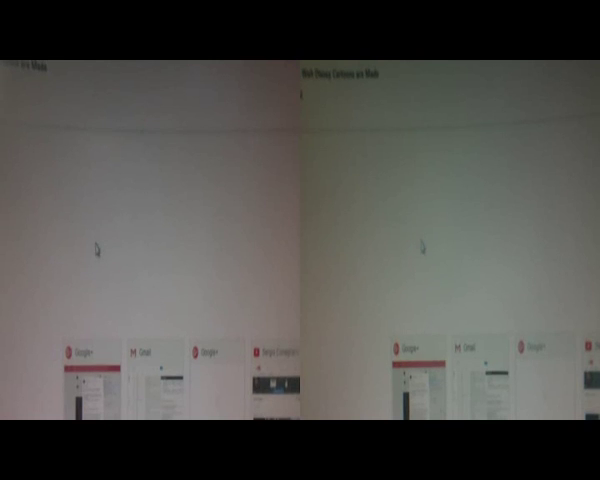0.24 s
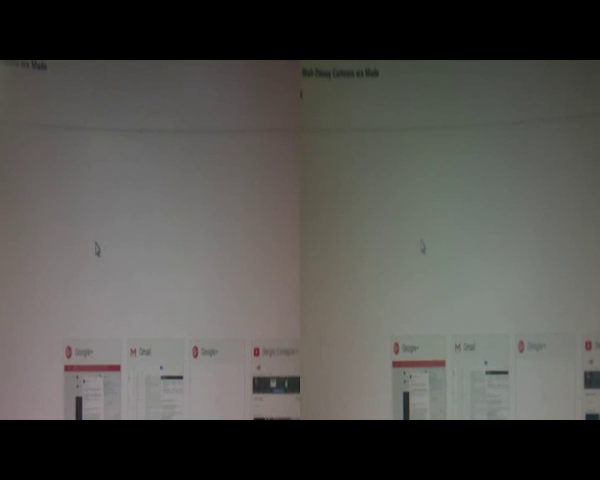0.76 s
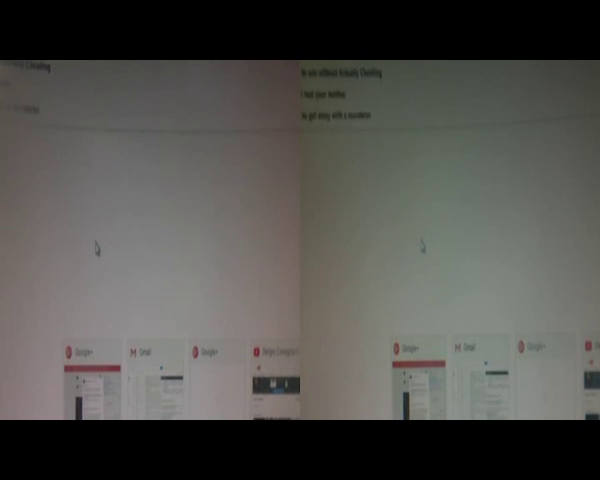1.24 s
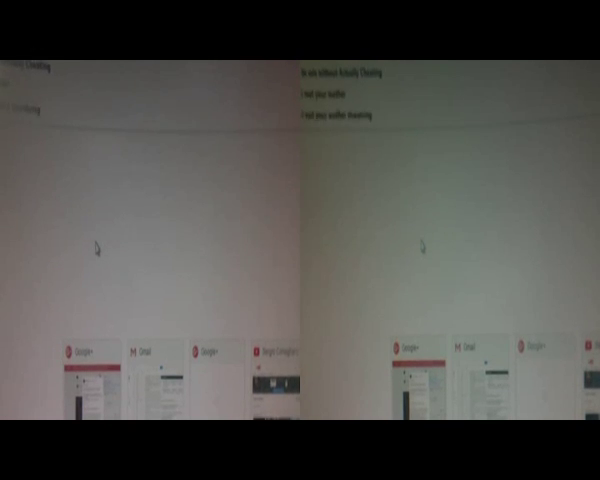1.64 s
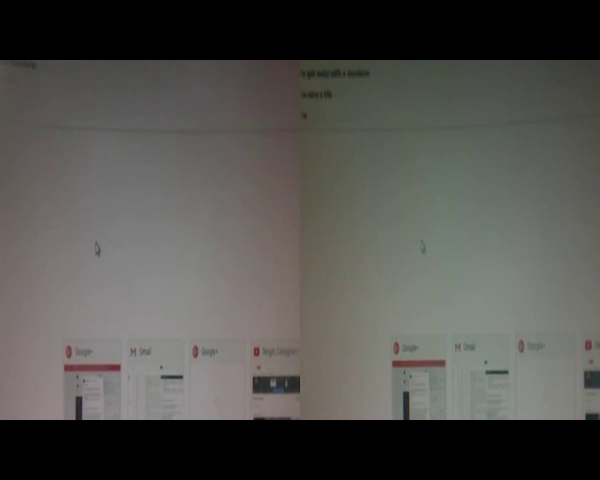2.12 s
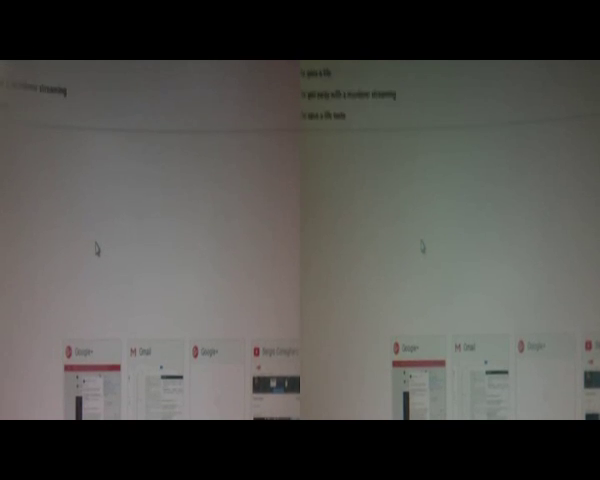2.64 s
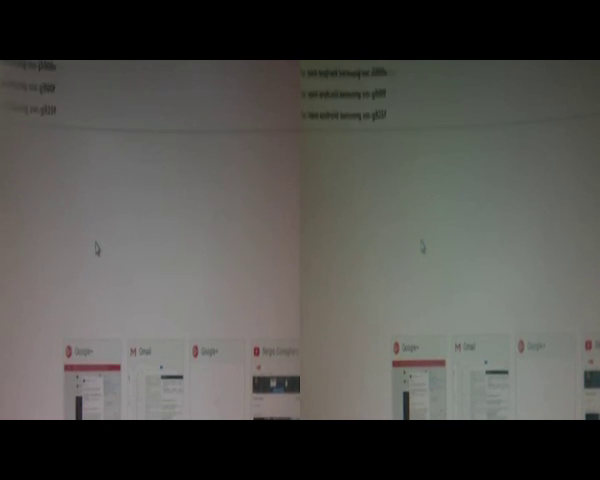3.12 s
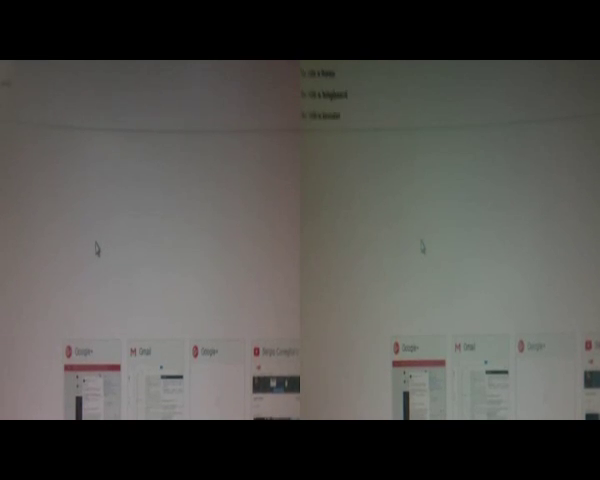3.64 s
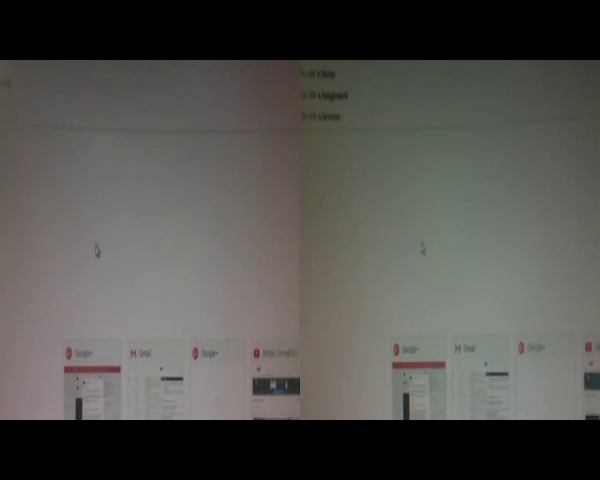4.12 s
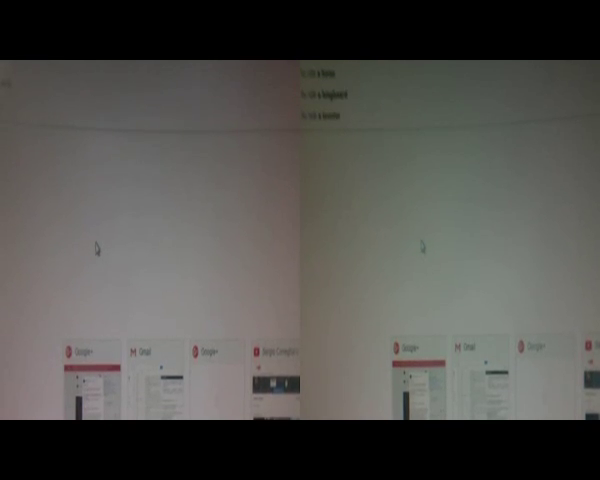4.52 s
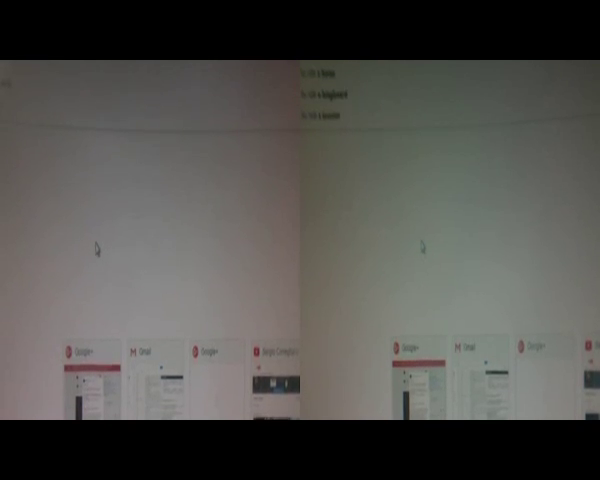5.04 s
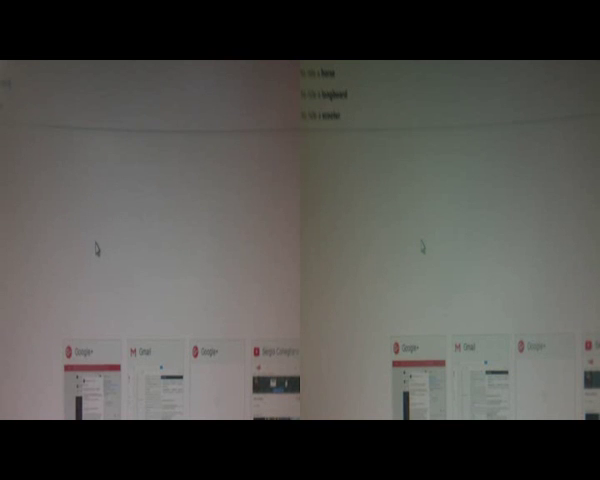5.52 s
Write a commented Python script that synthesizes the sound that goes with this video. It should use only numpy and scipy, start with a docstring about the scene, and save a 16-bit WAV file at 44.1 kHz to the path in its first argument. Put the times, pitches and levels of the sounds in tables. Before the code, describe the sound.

A laptop in a small room is heard very closely through the stereo microphones in its lid. At once a hard, rattling knock hits the plastic case, bouncing for a few hundredths of a second; a faint drag follows. At about 0.28 s a second knock chatters into a short scrape with thin, high squeals, gone by 0.5 s. The soft wide hiss and faint low hum sink, then creep back over the next second. A dull, weak key touch comes at 0.65 s, another at 1.07, then clearer strokes at 1.4 and 1.5 over a light brushing wash, and one near 2.0. From 2.5 to 3.3 s clicks and loose taps crowd together, with a sharp one at 2.95. More crisp bursts come at 3.5 and 3.7 to 4.05. After a pause, a stroke and a lighter one fall at 4.7 to 4.85; a last quick pair comes around 5.7.

```python
"""A small room: typing on a laptop, heard by the pair of microphones in its own lid.
Two heavy, rattling knocks on the case and a short plastic scrape come first, then full keystrokes and
light taps in quick bursts. Each contact is banded noise and a brief ring, coloured by the case modes and
left to die away; each stroke also adds a plate flex and a low thump. Swells of filtered noise make washes
and scrapes, gliding tones make the squeals, and a soft wide hiss with a faint wavering hum lies beneath."""
import sys
import numpy as np
from scipy import signal
from scipy.fft import rfft, irfft
from scipy.io import wavfile

SR = 44100
rng = np.random.default_rng(int(sys.argv[2]) if len(sys.argv) > 2 else 0)


def dump(signal):
    """Clip the signal to [-1, 1] and save it as 16-bit WAV at the path in sys.argv[1]."""
    limited = np.clip(np.atleast_2d(signal).T, -1, 1)
    pcm = np.round(limited * 32767).astype(np.int16)
    wavfile.write(sys.argv[1], SR, pcm)


N = 254456
TIME = np.arange(N) / SR  # s
FREQ = np.maximum(np.arange(N // 2 + 1) * SR / N, 1)  # Hz, kept off zero

# Background hiss before its trim and dip. Each row: frequency in Hz, density in dB per Hz,
# side over mid in dB.
HISS_COLOUR = [(25.8, -90.5, 11), (77, -76.5, 12), (173, -71.5, 9), (392, -75.5, 9.5), (990, -84, 3.5),
               (2200, -88.5, 1.5), (5040, -93, 4.5), (7280, -96, 6), (8150, -98, 4.5), (9050, -104, 42),
               (12400, -99, 18), (15000, -106, 35.5)]
# Hum of mains and fan, before the same trim and dip. Each row: frequency in Hz, width in Hz of
# a resonance that is applied twice, level in dB.
HUM_TONES = [(120.2, 4.4, -66), (208.4, 24, -62)]
# Case resonances under a slow drag. Each row: frequency in Hz, width in Hz, relative level in dB.
DRAG_MODES = [(1217, 110, 7), (1775, 180, 2.5), (2810, 330, 2), (5090, 135, -12.5)]
# Swells of filtered noise: the rattling wash of the first knock, plastic sliding, a hand brushing,
# a soft wash around a keystroke. Each row: start in seconds, swell in seconds, hold in seconds,
# fade by 60 dB in seconds, wash level in dB, squeak level in dB.
WASHES = [(0, 0.0015, 0.023, 0.16, -25, -30.5), (0.083, 0.048, 0.12, 0.45, -52, -48),
          (0.278, 0.0091, 0.016, 0.08, -32, -18), (0.313, 0.024, 0.046, 0.14, -35, -25.5),
          (0.387, 0.008, 0.031, 0.16, -40.5, -44), (0.605, 0.053, .03, 0.6, -53.5, -60),
          (1.143, 0.027, .025, .12, -51.5, -81), (1.61, 0.11, 0.18, 1.85, -50.5, -61)]
# Broad colour of these swells. Each row: frequency in Hz, relative level in dB.
WASH_COLOUR = [(60, -21.5), (160, -2), (270, 5), (390, 3), (510, 6), (760, 2), (1190, 2.5), (1500, 0),
               (1900, 2), (2400, -4), (3000, 0.5), (4000, -5.5), (7000, -10.5), (15000, -38.5)]
# Narrow treble resonances of these swells. Each row: frequency in Hz, width in Hz, relative level in dB.
SQUEAK_MODES = [(4700, 150, -9.5), (4935, 41, -1.5), (5130, 140, 0.5), (5340, 50, 0), (5590, 170, 4),
                (6260, 170, 3.5), (7160, 560, 2.5), (8450, 89, -2), (12240, 410, 5.5), (12750, 100, 5),
                (12800, 1300, -6.5), (13750, 53, 3.5)]
# Squeals of the catching edge. Each row: start in seconds, hold in seconds, pitch in Hz,
# glide in Hz per second, level in dB.
SQUEALS = [(0.289, .003, 5040, 12000, -21), (0.34, 0.013, 5330, -18000, -25.5),
           (0.359, 0.01, 5270, -9000, -35), (0.399, .018, 5460, 6000, -35.5)]
# Modes of the case. Each row: frequency in Hz, width in Hz, level over the direct sound in dB.
CASE_MODES = [(210.3, 20, 6), (301.5, 24, 2), (484.6, 14, 1), (526, 5.1, -6), (642.5, 28, 3),
              (780, 30, -10.5), (838, 7.6, -9), (942, 31, -4.5), (1057, 69, -0.5), (1124, 14, -9.5),
              (1202, 24, 2.5), (1385, 63, -6.5), (1620, 10, -10.5), (1770, 15, -17), (1988, 92, -0.5),
              (2200, 19, -6.5), (2340, 13, -5), (2920, 130, -11), (3430, 99, -2.5), (3643, 52, -2.5),
              (4190, 50, -3), (4900, 36, -8.5), (5400, 57, -2.5)]
# Pitches at which the case hardly radiates. Each row: frequency in Hz, width in Hz,
# dB left at the centre.
CASE_DIPS = [(140, 22, -9.5), (416, 33, -7.5), (575, 12, -4)]
# Colour and decay of any contact. Each row: frequency in Hz, relative level in dB,
# tail decay by 60 dB in seconds.
CONTACT_COLOUR = [(103, -14.5, .28), (148.1, -17, 0.31), (228, -3.5, 0.097), (390, -16, 0.18),
                  (650, -16, 0.23), (900, -12, 0.36), (1260, -12.5, 0.084), (2180, -12.5, 0.21),
                  (4130, -8, 0.15), (5800, -8.5, 0.27), (8560, -11.5, 0.039), (14400, -17, 0.086)]
# Blows on the case, with their bounces and the bumps of the scrape; levels are before contact and case colour.
# Each row: time in seconds, thud in dB, clack in dB, click in dB, ring in Hz, ring level in dB.
KNOCKS = [(.0066, -32.5, -13, -25.5, 900, 4), (.0076, -28.5, -14, -14.5, 1435, 0),
          (.008, -25, -19, -25, 493.6, -1.5), (.0088, -25, -34, -19.5, 295, -9.5),
          (.0094, -39.5, -19.5, -16, 2200, -5.5), (.0125, -29.5, -21, -25, 1180, -13),
          (.018, -27, -17.5, -26.5, 640, -11.5), (.0255, -31.5, -27, -30, 650, -21.5),
          (.0385, -32.5, -38, -39.5, 496, -23.5), (.0465, -26, -21, -44.5, 460, -19.5),
          (.058, -32.5, -36, -44.5, 480, -20.5), (.165, -56.5, -47, -55.5, 1254, -28.5),
          (.2812, -32, -22.5, -25, 517, -14.5), (.2838, -33.5, -20.5, -18.5, 282, -10.5),
          (.287, -31.5, -26.5, -24, 560, -23), (.2918, -30, -22, -20.5, 1250, -13),
          (.3005, -46, -40, -27.5, 2150, -22.5), (.31, -44.5, -39, -31, 2100, -23),
          (.334, -50.5, -46.5, -50, 317, -27.5), (.3435, -44, -33.5, -44.5, 1066, -25.5),
          (.349, -44.5, -35.5, -40, 795, -27), (.356, -47, -31, -46, 320, -30),
          (.3665, -45, -39.5, -32.5, 770, -27.5), (.376, -52, -48, -27, 2010, -31),
          (.393, -34, -36, -33, 260, -34.5), (.405, -47.5, -46, -37, 1076, -33),
          (.413, -37.5, -43, -34.5, 1250, -36)]
# Full keystrokes, levels before contact and case colour. Each row: time in seconds, clack in dB, click in dB,
# cap ring in Hz, cap ring in dB, plate pitch in Hz, plate level in dB, travel to the bottom in seconds,
# bottoming over first contact in dB, thud in dB, bottom ring in Hz, bottom ring in dB,
# time to settle in seconds, settling over bottoming in dB.
STROKES = [(0.6488, -43, -50, 1200, -35.5, 426, -40.5, 0.0052, 2, -38, 1900, -39, 0.0057, 0.5),
           (1.0652, -35, -36.5, 3117, -20.5, 974, -47, 0.0082, 0.5, -43.5, 1950, -27.5, 0.0075, -8.5),
           (1.3837, -25.5, -27.5, 2863, -26, 635, -32, 0.0093, -0.5, -25.5, 517, -28, 0.008, -17),
           (1.4756, -32, -26.5, 1667, -26, 1120, -38, 0.011, 0.5, -35, 3750, -27, 0.0044, -9.5),
           (1.972, -22.5, -22.5, 4340, -18, 1116, -31, 0.0079, -12.5, -49, 690, -26.5, 0.0084, -11),
           (2.476, -27, -31.5, 4500, -24, 1020, -29, 0.0036, 2.5, -47, 2383, -22.5, 0.0037, -9),
           (2.5914, -28.5, -33.5, 3240, -32, 707, -34, 0.0074, -20, -45.5, 3670, -33, 0.0062, -14),
           (2.6321, -21, -25.5, 5530, -17, 1900, -46, 0.0071, -2.5, -34, 1090, -29.5, 0.0064, -12),
           (2.718, -22.5, -26.5, 1823, -13.5, 1110, -25.5, 0.0081, -1, -33, 4620, -22, 0.0074, -12),
           (2.9567, -17, -16.5, 2250, -11, 930, -28, 0.0068, -28, -40, 3383, -16, 0.012, -15),
           (3.4998, -23.5, -26, 4110, -19.5, 670, -26.5, 0.013, -1.5, -40.5, 2910, -16.5, 0.008, -7),
           (3.705, -22.5, -18.5, 3010, -11.5, 1060, -27.5, 0.0062, -4.5, -56, 4000, -10.5, 0.009, -16),
           (3.793, -34, -25, 2894, -22.5, 870, -55, 0.0059, -8, -44, 3460, -40, 0.0078, -9),
           (3.967, -23.5, -28.5, 3750, -20, 1170, -43, 0.0079, 3, -29.5, 3520, -15.5, 0.0055, -9.5),
           (4.051, -23, -24.5, 1816, -15, 1110, -24, 0.0043, -4.5, -37.5, 1620, -24.5, 0.0088, 1),
           (4.7337, -22.5, -21, 4740, -11.5, 1073, -26.5, 0.0064, -8, -43.5, 3730, -14, 0.011, -6.5),
           (4.8335, -37.5, -36, 3337, -30.5, 1180, -45, 0.0093, -1.5, -61, 3420, -25, 0.0094, -3),
           (5.6745, -25, -27, 3010, -31, 1760, -31, 0.0059, -7, -42.5, 698, -18, .006, 0),
           (5.747, -26, -35, 1620, -29, 647, -33.5, 0.0075, -1, -44, 3720, -30.5, 0.0086, -3)]
# Light taps: a finger landing, a key springing back or rattling loosely; levels before contact and case colour.
# Each row: time in seconds, clack in dB, click in dB, ring in Hz, ring level in dB.
TAPS = [(0.659, -41.5, -64, 1236, -41.5), (0.6657, -59, -55.5, 1800, -43),
        (0.675, -45.5, -50, 324.4, -31.5), (0.681, -56, -50, 1506, -49), (0.696, -52, -61, 1298, -50),
        (1.191, -42.5, -45, 669, -43), (1.402, -31, -53, 470, -25.5), (1.4814, -24, -31, 1264, -27.5),
        (1.4985, -42, -28.5, 3690, -21), (1.9077, -35, -40, 1080, -40), (2.014, -32.5, -37, 627, -34),
        (2.061, -34, -37, 589, -39), (2.067, -49, -42, 1060, -42), (2.081, -51, -39, 2020, -37),
        (2.5995, -52, -39, 4030, -27), (2.6491, -38, -42, 330, -29), (2.6607, -46, -52, 839, -29),
        (2.672, -49, -54, 940, -37), (2.683, -52, -52, 900, -34), (2.703, -35.5, -44, 1150, -44),
        (2.755, -52, -43, 910, -37), (2.9535, -25, -34, 2070, -37), (3.0008, -37, -31, 574, -32),
        (3.0405, -31.5, -37.5, 553, -20.5), (3.05, -59, -47, 577, -34), (3.176, -25.5, -25.5, 4700, -35),
        (3.223, -39.5, -39, 4780, -32), (3.256, -38.5, -40, 3600, -43), (3.2765, -38, -46, 2210, -31),
        (3.2782, -41, -37, 990, -26), (3.281, -44, -53, 652, -31.5), (3.541, -28.5, -35, 1004, -34.5),
        (3.5635, -34, -36, 626, -33.5), (3.587, -34, -33, 3070, -30), (3.596, -48, -36, 1800, -39),
        (3.729, -32.5, -45, 972, -33), (3.7864, -32, -33, 794, -34), (3.972, -28, -36, 3680, -27),
        (3.9865, -36, -37, 636, -24.5), (4.043, -43, -46, 1194, -33), (4.8378, -39.5, -35, 3500, -26.5),
        (4.845, -46, -45, 3750, -26), (5.6818, -23.5, -39, 1109, -20), (5.6923, -33, -51, 556, -22.5),
        (5.7, -40, -50.5, 531, -25.5), (5.7065, -37, -58, 660, -36.5)]
# The two microphones. Each row: frequency in Hz, side over mid in dB, left over right in dB.
MIC_PAIR = [(100, 4, -8.5), (250, -3.5, -6), (600, -8, -1), (1500, -7, -.5), (3120, -2.5, 2),
            (4770, 2.5, 3), (9800, 15.5, 1.5), (12900, 9, 1.5)]

# The hiss sinks to its lowest at HUSH_S, then creeps back; its treble sinks further by a share of the dip
HUSH_S, HUSH_FALL_S, HUSH_DB, RECOVER_DB_PER_S = 0.47, 0.49, -10, 8.5
HISS_TRIM_DB, HISS_TREBLE_DB, TREBLE_EXTRA_DIP = 0.5, 0.5, 0.67
DRAG_S, DRAG_DB = 0.076, -46.5
# Sparse bursts that crackle out of the washes; the level is against their dense noise
CRACKLE_PER_S, CRACKLE_SCATTER_DB, CRACKLE_DB, CRACKLE_DECAY_S = 310, 4.5, -3.5, 0.00073
SQUEAL_WIDTH_HZ, SQUEAL_RISE_S, SQUEAL_T60_S = 340, .002, .05
# Lowest swing of the whole case; the level is against the stroke's thud
THUMP_HZ, THUMP_RISE_S, THUMP_T60_S, THUMP_DB = 211.4, .004, .17, -4.5
PLATE_LAG_S, PLATE_PEAK_S = .0015, 0.0027  # the flex starts just after the click; time to its widest swing
RING_BLUR = 1.2  # unsteadiness of a struck part's pitch
FIRST_THUD_DB, BOTTOM_THUD_DB = -6.5, -2  # dull bursts against the stroke's thud
BOTTOM_CLICK_DB = 3.5  # extra treble of the bottoming and settling
TAP_THUD_DB = -13  # thud of a light tap against its clack
TOP_HZ = 15600  # the sound ends above this


def undb(db):
    """Decibels to gain."""
    return 10 ** (np.asarray(db) / 20)


def over_hz(table, hz):
    """Read the columns of a table at the given frequencies, on a log axis."""
    points, *columns = np.transpose(table)
    return [np.interp(np.log(hz), np.log(points), column) for column in columns]


def shaped(x, response):
    """Filter by a frequency response."""
    return irfft(rfft(x) * response, N)


def unit(x):
    """Scale to rms 1."""
    return x / np.sqrt(np.mean(x ** 2, axis=-1, keepdims=True))


def resonances(modes):
    """Frequency response of damped modes side by side."""
    return sum(undb(db) / (1 + 1j * hz / width * (FREQ / hz - hz / FREQ)) for hz, width, db in modes)


def mid_side(side_db):
    """Mid and side gains that share the power."""
    mid = 1 / np.sqrt(1 + undb(2 * side_db))
    return mid, mid * undb(side_db)


def swell(start, swell_s, hold_s, t60):
    """Rise in a straight line, hold and die away exponentially."""
    age = TIME - start
    fading = np.maximum(age - swell_s - hold_s, 0)
    return np.clip(age / swell_s, 0, 1) * np.exp(-np.log(1000) * fading / t60)


def uneven(scatter_db, hold, *shape):
    """Random gain that jumps to a new value every few samples."""
    steps = rng.standard_normal((*shape[:-1], shape[-1] // hold + 1))
    return undb(scatter_db * np.repeat(steps, hold, axis=-1)[..., :shape[-1]])


def background(treble_hz=2000):
    """Wide soft noise with a narrow-band hum; both dip once and recover at a steady rate in dB."""
    db, side_db = over_hz(HISS_COLOUR, FREQ)
    sinking = np.clip(1 + (TIME - HUSH_S) / HUSH_FALL_S, 0, 1)
    recovery_db = RECOVER_DB_PER_S * np.maximum(TIME - HUSH_S, 0)
    dip_db = sinking * np.minimum(HUSH_DB + recovery_db, 0)
    density = undb(db) * np.sqrt(SR / 2)
    hiss = shaped(rng.standard_normal((2, N)), density * np.array(mid_side(side_db)))
    low = shaped(hiss, 1 / (1 + (FREQ / treble_hz) ** 2))
    treble = (hiss - low) * undb(HISS_TREBLE_DB + TREBLE_EXTRA_DIP * dip_db)
    mid, side = low + treble
    for hz, width, hum_db in HUM_TONES:
        hum = shaped(rng.standard_normal(N), resonances([(hz, width, 0)]) ** 2)
        mid = mid + undb(hum_db) * unit(hum)
    return np.array([mid + side, mid - side]) * undb(HISS_TRIM_DB + dip_db)


def dragging():
    """A light drag between the two knocks: noise sings in a few resonances of the case."""
    rasp = unit(shaped(rng.standard_normal((2, N)), resonances(DRAG_MODES)))
    return rasp * undb(DRAG_DB) * swell(DRAG_S, swell_s=0.037, hold_s=0.075, t60=0.41)


def crackle():
    """Sparse impulses of uneven size, each a tiny decaying burst of noise."""
    sizes = undb(CRACKLE_SCATTER_DB * rng.uniform(-1, 1, N))
    impulses = (rng.random(N) < CRACKLE_PER_S / SR) * sizes
    bursts = signal.lfilter([1], [1, -np.exp(-1 / (CRACKLE_DECAY_S * SR))], impulses)
    return unit(bursts * rng.standard_normal((2, N)))


def washes(grain_db=-3.0, flutter_db=1.5):
    """Swells of uneven noise and a coarser crackle, through a broad colour and narrow treble resonances."""
    grains = uneven(grain_db, SR // 1000, N) * rng.standard_normal((2, N))
    grains = grains * uneven(flutter_db, SR // 250, N)  # a slower unevenness
    grains = unit(grains) + undb(CRACKLE_DB) * crackle()
    wash = unit(shaped(grains, undb(over_hz(WASH_COLOUR, FREQ)[0])))
    squeak = unit(shaped(grains, resonances(SQUEAK_MODES)))
    out = np.zeros((2, N))
    for start, swell_s, hold_s, t60, wash_db, squeak_db in WASHES:
        out += swell(start, swell_s, hold_s, t60) * (wash * undb(wash_db) + squeak * undb(squeak_db))
    return out


def squeals():
    """Each catch of the sliding edge sings a gliding note, its level and phase roughened by noise."""
    out = np.zeros((2, N))
    for start, hold_s, hz, glide, db in SQUEALS:
        pitch = hz + glide * np.clip(TIME - start, 0, hold_s + SQUEAL_T60_S / 2)
        rough = unit(shaped(rng.standard_normal((2, N)), 1 / (1 + (FREQ / SQUEAL_WIDTH_HZ) ** 2)))
        phase = 2 * np.pi * np.cumsum(pitch) / SR
        note = (1 + 0.44 * rough) * np.sin(phase + 0.88 * rough[::-1])
        out += undb(db) * swell(start, SQUEAL_RISE_S, hold_s, SQUEAL_T60_S) * note
    return out


def case():
    """Frequency response of the case: the direct sound, its modes and the dead spots between them."""
    dips = [1 - (1 - undb(db)) * resonances([(hz, width, 0)]) for hz, width, db in CASE_DIPS]
    return (1 + resonances(CASE_MODES)) * np.prod(dips, axis=0)


def thumps():
    """A key that hits the bottom sets the whole case swinging at one low pitch."""
    out = np.zeros((2, N))
    for start, _, _, _, _, _, _, travel_s, _, thud_db, *_ in STROKES:
        bottom = start + travel_s
        swing = np.sin(2 * np.pi * THUMP_HZ * (TIME - bottom))
        out[0] += undb(thud_db + THUMP_DB) * swell(bottom, THUMP_RISE_S, 0, THUMP_T60_S) * swing
    return out


def plate():
    """Every stroke flexes the plate under the keys: a few woody cycles whose pitch depends on the stroke."""
    out = np.zeros((2, N))
    for start, _, _, _, _, hz, db, *_ in STROKES:
        age = np.maximum(TIME - start - PLATE_LAG_S, 0)
        progress = age / PLATE_PEAK_S
        flex = (progress * np.exp(1 - np.minimum(progress, 20))) ** 2
        out[0] += undb(db) * flex * np.sin(2 * np.pi * hz * age)
    return out


def struck_rings(ring_hz, ring_db, ring_s, rise, t):
    """Each struck part rings for a few milliseconds at its own pitch, low ones the longest."""
    hz = ring_hz[:, None]
    life = ring_s * (1000 / hz) ** 0.5
    steps = rng.standard_normal((len(hz), len(t)))
    wander = RING_BLUR * np.cumsum(steps, axis=1) * hz / SR  # small loose parts ring the least purely
    return undb(ring_db)[:, None] * np.sin(2 * np.pi * hz * t + wander) * rise * np.exp(-t / life)


def contact_level(thud, clack, click, top_db, hz):
    """Level of one contact at a frequency: thud, clack and click from low to high."""
    hardness = 0.14  # a sharp click reaches higher into the treble than a dull clack
    top = click + top_db + hardness * (click - clack)
    curve = [(300, thud), (560, clack), (1700, clack), (3200, click), (5000, click), (12000, top)]
    return over_hz(curve, hz)[0]


def contacts(table, crack_s, tail_db, ring_s, top_db, grain_db):
    """Each contact is a brief crack, a short ring and a fading tail; rows: direct sound, scattered twin."""
    size = SR // 3
    t = np.arange(size) / SR
    times, thud_db, clack_db, click_db, ring_hz, ring_db = np.transpose(table)
    centres = 100 * 2 ** (np.arange(15) / 2)  # Hz, half-octave bands
    chatter = uneven(grain_db, SR // 1000, len(times), 1, size)  # loose plastic chatters
    noise = chatter * rng.standard_normal((len(times), 2, size))
    own_db = rng.standard_normal((len(times), len(centres)))  # no two contacts sound alike
    rise = 1 - np.exp(-t / 0.00086)  # the contact takes a moment to build
    ring = struck_rings(ring_hz, ring_db, ring_s, rise, t)
    hits = np.stack([ring, 0 * ring], axis=1)
    # A sharp click is also over sooner than a dull clack
    snap = undb(-0.3 * (click_db - clack_db))[:, None, None]
    level_window_s = .0025  # a band's energy is counted per level window
    for band, hz in enumerate(centres):
        colour_db, t60 = over_hz(CONTACT_COLOUR, hz)
        db = np.array([contact_level(thud, clack, click, top_db, hz)
                       for thud, clack, click in zip(thud_db, clack_db, click_db)])
        crack = np.exp(-t / (crack_s * snap * (1000 / hz) ** 0.032))  # the treble snaps off soonest
        tail = undb(tail_db - 60 * t / t60)
        edges = [hz / 2 ** (1 / 4), hz * 2 ** (1 / 4)]
        sos = signal.butter(2, edges, "band", fs=SR, output="sos")
        rattle = unit(signal.sosfilt(sos, noise * rise * (crack + tail)))
        rattle = rattle * np.sqrt(level_window_s * SR / size)
        gain = undb(db + colour_db + own_db[:, band])[:, None, None]
        hits = hits + (-1) ** band * rattle * gain  # neighbouring bands alternate in sign
    out = np.zeros((2, N + size))
    for time, hit in zip(times, hits):
        start = max(int(time * SR), 0)
        out[:, start:start + size] += hit
    return out[:, :N]


def keystrokes():
    """A stroke is three contacts: finger hits cap, cap bottoms with a thud, then settles; a tap is one."""
    rows = []
    for (start, clack, click, cap_hz, cap_db, _, _, travel_s, bottom_db, thud,
         bottom_hz, bottom_ring_db, settle_s, settle_db) in STROKES:
        rows.append((start, thud + FIRST_THUD_DB, clack, click, cap_hz, cap_db))
        bottom = start + travel_s
        for at, db in [(bottom, 0), (bottom + settle_s, settle_db)]:
            rows.append((at, thud + BOTTOM_THUD_DB + db, clack + bottom_db + db,
                         click + bottom_db + BOTTOM_CLICK_DB + db, bottom_hz, bottom_ring_db + db))
    for start, clack, click, hz, ring_db in TAPS:
        rows.append((start, clack + TAP_THUD_DB, clack, click, hz, ring_db))
    return rows


def microphones(sound):
    """The left port lags the right; towards the treble the two swing against each other."""
    side_db, left_db = over_hz(MIC_PAIR, FREQ)
    mid_gain, side_gain = mid_side(side_db)
    direct, scattered = rfft(sound)
    direct_share = .66  # of the side power
    mid = mid_gain * direct
    lagging = -1j * np.sqrt(direct_share) * direct  # a quarter cycle late
    side = side_gain * (lagging + np.sqrt(1 - direct_share) * scattered)
    left = (mid + side) * undb(left_db / 2)
    right = (mid - side) * undb(-left_db / 2)
    return irfft(np.array([left, right]), N)


def scene():
    """Knocks and keys ring the same case; washes, squeals, drag and thumps bypass its response."""
    surface = dragging() + washes() + squeals()
    knocks = contacts(KNOCKS, crack_s=0.0015, tail_db=-22, ring_s=0.0027, top_db=0, grain_db=-2.0)
    keys = contacts(keystrokes(), crack_s=0.005, tail_db=-12.0, ring_s=0.0033, top_db=-3.5, grain_db=3.5)
    through_case = shaped(knocks + keys + plate(), case())
    return background() + microphones(surface + thumps() + through_case)


def record(dry, dip_hz=9850, dip_half_width_hz=800):
    """The sound has a narrow dip near 9.85 kHz, is clipped at full scale and loses its top."""
    order = 8
    offset_hz = np.abs(FREQ - dip_hz) + 1
    dipped = shaped(dry, 1 / np.sqrt(1 + (dip_half_width_hz / offset_hz) ** order))
    top_cut = signal.ellip(8, .2, 70, TOP_HZ, fs=SR, output="sos")
    return signal.sosfilt(top_cut, np.clip(dipped, -1, 1))


dry = scene()
out = record(dry)
dump(out)
```